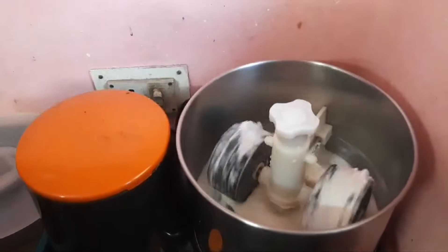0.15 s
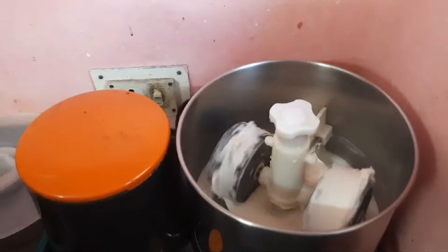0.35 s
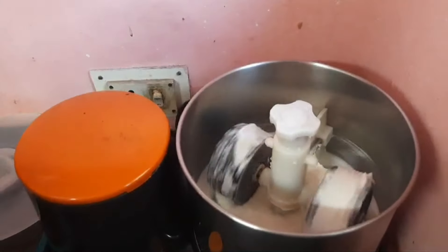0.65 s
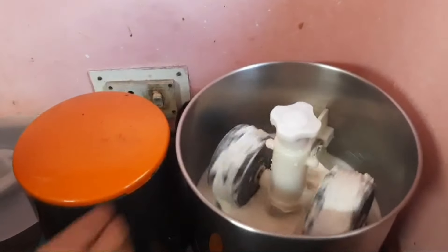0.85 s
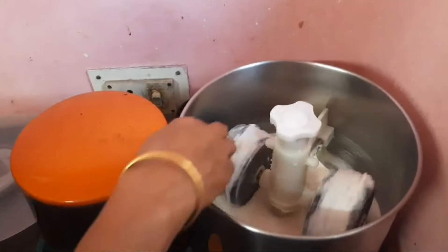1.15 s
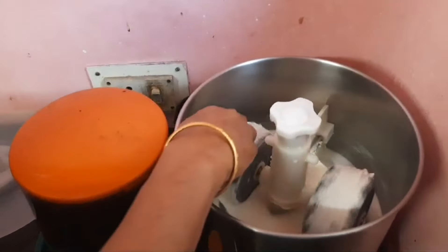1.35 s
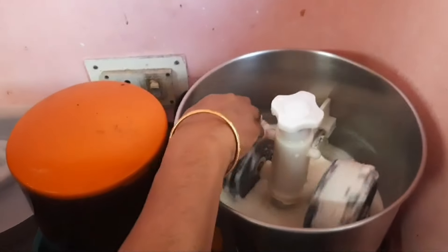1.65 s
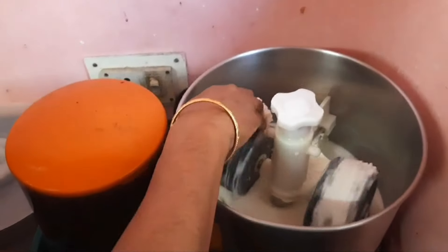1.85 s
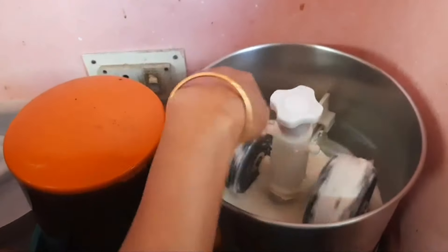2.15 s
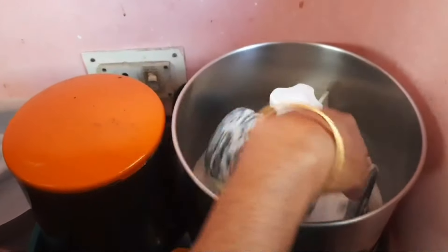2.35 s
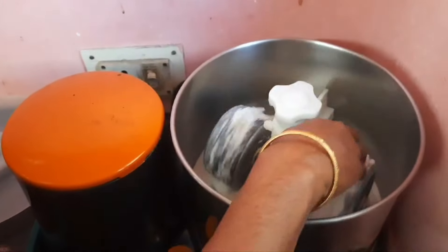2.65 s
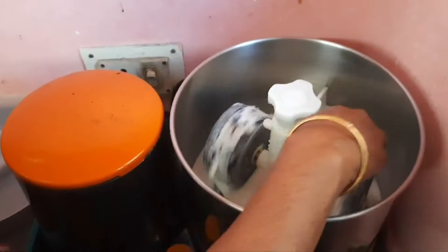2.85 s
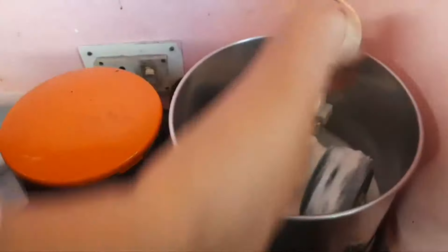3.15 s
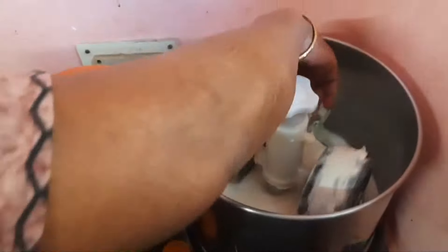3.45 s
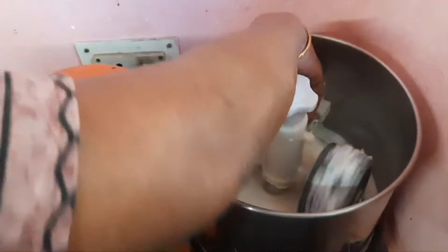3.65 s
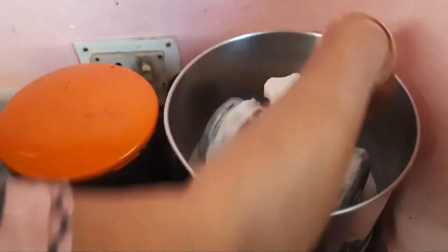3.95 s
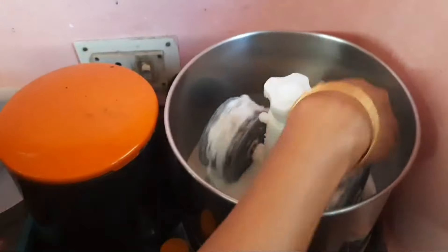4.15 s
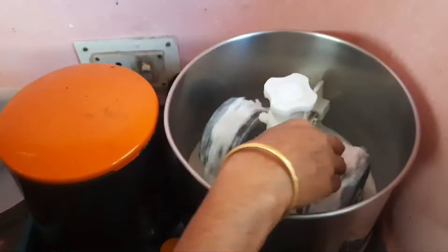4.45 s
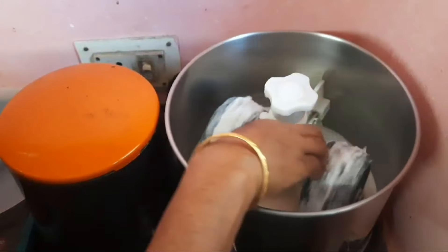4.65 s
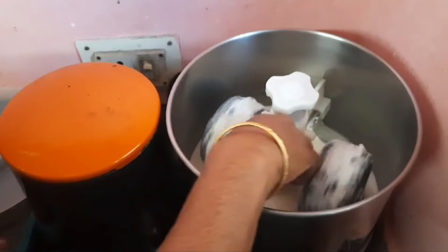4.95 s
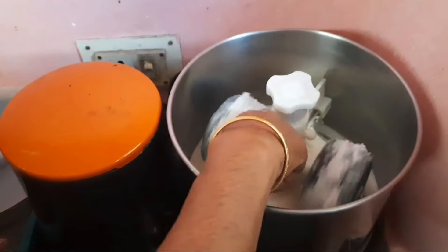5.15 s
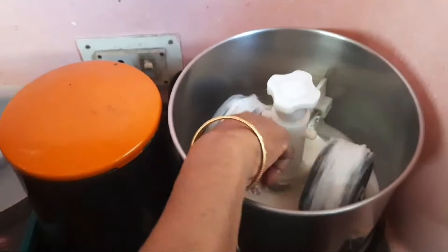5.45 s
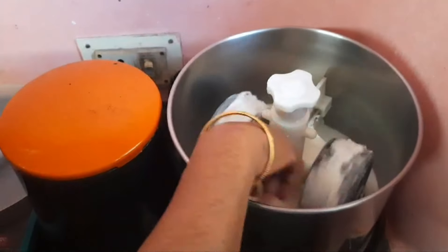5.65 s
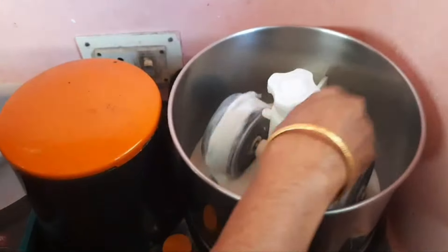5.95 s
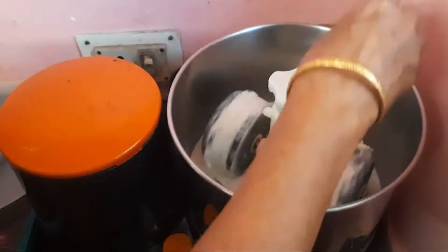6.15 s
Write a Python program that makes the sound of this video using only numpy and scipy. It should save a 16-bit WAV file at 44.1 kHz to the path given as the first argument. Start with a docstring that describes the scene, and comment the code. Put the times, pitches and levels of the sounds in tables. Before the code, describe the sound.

Close, steady motor hum and gritty stone grinding in a metal drum, irregular grain crunches, and a single hard knock near the start.

```python
"""A small kitchen, a tabletop wet grinder close to a microphone with two ports.
From the start its motor hums in steady tones, and two stone rollers shake the casing and ring the steel drum;
stone rubs through wet grain, batter snaps, and grains crunch in short bursts, soft ones about once a roller turn.
At 0.8 s something is set down on the counter with a knock and bounces; the walls return knock and grinding.
From about 4 s a low drone swells from outside. All levels are those before the microphone rounds the peaks."""
import sys
import numpy as np
from scipy import signal
from scipy.fft import rfft, irfft, next_fast_len
from scipy.io import wavfile

SR = 44100
rng = np.random.default_rng(int(sys.argv[2]) if len(sys.argv) > 2 else 0)


def dump(signal):
    """Clip the signal to [-1, 1] and save it as 16-bit WAV at the path in sys.argv[1]."""
    limited = np.clip(np.atleast_2d(signal).T, -1, 1)
    pcm = np.round(limited * 32767).astype(np.int16)
    wavfile.write(sys.argv[1], SR, pcm)


N = 277830
T = np.arange(N) / SR


def from_db(db):
    """Decibels to gain."""
    return np.exp(np.asarray(db) * np.log(10) / 20)


def rms_one(x):
    """Scale to rms 1."""
    return x / np.sqrt(np.mean(x ** 2) + 1e-20)


def in_time(rows):
    """Columns of a curve over time, one value a sample."""
    s, *columns = np.transpose(rows)
    return [np.interp(T, s, column) for column in columns]


def at_hz(points, hz):
    """Read a spectrum on a log-frequency axis."""
    where, level_db = np.transpose(points)
    return np.interp(np.log(hz), np.log(where), level_db)


def drift(rate_hz):
    """Slow chance of spread 1: noise twice through a one-pole low-pass, made at every 40th sample."""
    r = np.exp(-2 * np.pi * rate_hz * 40 / SR)
    noise = rng.standard_normal(N // 40 + 2002)
    slow = signal.lfilter([1], [1, -2 * r, r * r], noise)[2000:]
    return np.interp(np.arange(N) / 40, np.arange(len(slow)), rms_one(slow))


def bandpass(order, low_hz, high_hz, x):
    """Keep one band of x."""
    return signal.sosfilt(signal.butter(order, [low_hz, high_hz], "band", fs=SR, output="sos"), x)


def highpass(cutoff_hz, x):
    """Take the bass out of x."""
    return signal.sosfilt(signal.butter(2, cutoff_hz, "high", fs=SR, output="sos"), x)


def ringing(hz, r):
    """Feedback coefficients of a resonance that shrinks by r each sample."""
    return [1, -2 * r * np.cos(2 * np.pi * hz / SR), r * r]


# what the two microphone ports share: (f/Hz, likeness 0-1, left minus right level/dB, left late by samples)
PORTS = [(40, .95, 0, 4), (130, .99, 0, 4), (290, .995, 0, 4), (410, .8, -2, 6), (520, .65, 2.5, 7),
         (660, .55, 4.5, 8), (860, .45, 0.2, 8), (1300, .45, -0.2, 9), (1720, .4, 1.0, 11),
         (2000, .35, 1.5, 0.5), (2500, .3, 1.5, 1.5), (4500, .15, 1.5, 5), (5700, .1, .5, 5),
         (7300, .05, -3.5, 4), (9300, .05, 2.5, 4), (15000, .05, .3, 4)]


def spread(pair, hz):
    """Two unrelated signals reach the ports with the likeness, lean and lag of this pitch, at joint rms 1."""
    where, *columns = np.transpose(PORTS)
    alike, lean_db, lag = [np.interp(np.log(hz), np.log(where), column) for column in columns]
    alike = np.clip(alike, 0, 1)
    shared = np.sqrt(1 + alike) * pair[0]
    opposed = np.sqrt(1 - alike) * pair[1] * [[1], [-1]]
    left, right = rms_one(shared + opposed)
    return np.array([np.roll(left, round(lag)) * from_db(lean_db / 2), right * from_db(-lean_db / 2)])


def gritty(per_s, size_db, share):
    """Two pairs of noises (neighbouring bands take turns) that carry grit clicks at shared moments."""
    sizes = from_db(size_db * np.minimum(rng.exponential(1, N), 3))
    clicks = (rng.random(N) < per_s / SR) * sizes
    return rng.standard_normal((2, 2, N)) * np.sqrt(1 + (share * rms_one(clicks)) ** 2)


def shaken(modes, force, flicker_db):
    """The force through each resonance twice, which keeps the valleys dark; each one may flicker by itself."""
    out = 0
    for k, (hz, width_hz, level_db) in enumerate(modes):
        section = [1, 0, -1, *ringing(hz, np.exp(-np.pi * width_hz / SR))]
        gain = from_db(level_db + (flicker_db * drift(17.5) if flicker_db else 0))
        out = out + gain * spread(signal.sosfilt([section, section], force[k % 2]), hz)
    return out


# motor tones, most near multiples of twice the mains rate: (f/Hz, rms level/dB, left minus right level/dB, waver/dB)
HUM = [(99.9, -47, 0, 3.0), (199.9, -52, 0, 3.0), (300.1, -18.5, 0, 1.5), (744.6, -41, 8, 2.0),
       (800.1, -36, -2, 1.5)]


def motor():
    """Magnetic pull in the induction motor gives tones of fixed pitch, each wavering a little in level."""
    out = 0
    for hz, level_db, pan_db, waver_db in HUM:
        ports_db = level_db + waver_db * drift(2.54) + np.array([[pan_db / 2], [-pan_db / 2]])
        tone = np.sqrt(2) * np.sin(2 * np.pi * (hz * T + rng.random()))
        out = out + from_db(ports_db) * tone
    return out


# casing and counter resonances: (f/Hz, width f/Hz, rms level/dB before the load is added)
CASING = [(56, 11, -55), (95.4, 6.9, -44), (112.6, 11, -37.5), (133.5, 26, -42), (215.2, 34.5, -31.5),
          (240.7, 30.4, -29.5), (265, 25.4, -28), (281.14, 14.2, -17.5), (325.7, 39, -38), (390.5, 76, -36),
          (453.5, 54, -33), (547.5, 48, -36), (597, 76, -42.5), (737, 79, -37.5), (803, 25, -41.5),
          (862, 50, -45), (940, 70, -54)]


def casing(shake_db):
    """The rollers shake casing and counter: plain noise through their resonances, louder under load."""
    return from_db(shake_db) * shaken(CASING, rng.standard_normal((2, 2, N)), flicker_db=0)


# turns per s, a moment of most pressure/s, depth/dB
ROLLER_HZ, ROLLER_TOP_S, ROLLER_DB = 5.9, 3.03, .8


def roller_pressure(grind_db):
    """Pressure in dB: the grinding load, a swing with each roller turn and a small random flicker."""
    turn = np.cos(2 * np.pi * ROLLER_HZ * (T - ROLLER_TOP_S))
    return grind_db + ROLLER_DB * turn + .8 * drift(24.0)


# steel drum resonances: (f/Hz, width f/Hz, rms level/dB before pressure and flicker; relative in a crunch)
DRUM = [(1095.5, 32, -45.5), (1159, 91, -52), (1520, 52, -55.5), (1900, 98, -50), (2175, 420, -50),
        (2432, 364, -46.5), (3150, 520, -48.5), (3903, 400, -57), (4457, 150, -55.5), (5710, 1240, -52),
        (6300, 2000, -53), (8560, 890, -61), (11650, 2200, -61)]


def drum(force, pressure_db):
    """Gritty rubbing rings the steel drum, louder with pressure, each resonance flickering by itself."""
    return from_db(pressure_db) * shaken(DRUM, force, flicker_db=1.93)


# stone on stone through wet grain, a relative spectrum: (f/Hz, level/dB per Hz)
GRIND = [(30, -16), (70, -3), (160, -5.5), (350, 0), (700, -3.5), (950, -3), (1400, -9), (2700, -40.5),
         (3700, -24.5), (7000, -16), (10000, -28), (12000, -23.5), (14000, -25), (16500, -25.5)]
GRIND_DB = -32   # rms of the whole


def grinding(force, pressure_db, patchy_db):
    """Half-octave bands of the rubbing force; the treble follows the roller pressure and flickers a little."""
    out, edges = 0, 36 * 2 ** (np.arange(19) / 2)
    for k, (low, high) in enumerate(zip(edges, edges[1:])):
        hz = np.sqrt(low * high)
        band = bandpass(2, low, high, force[k % 2])
        treble = hz / (hz + 1500)
        gain_db = at_hz(GRIND, hz) + treble * (pressure_db + patchy_db * drift(37.0))
        out = out + from_db(gain_db) * np.sqrt(high - low) * spread(band, hz)
    return from_db(GRIND_DB) * rms_one(out)


CRACKLE_DB = -57.5   # rms at zero pressure


def crackle(pressure_db, per_s, cycles):
    """Wet batter tears off the stones in small snaps at one of eight pitches, losing 60 dB in these cycles."""
    sizes = from_db(3.0 * np.minimum(rng.exponential(1, N), 3)) * (rng.random(N) < per_s / SR)
    uneven = 1 + .4 * rng.standard_normal((2, N))   # each port gets its own strength and sign
    snaps = sizes * uneven * rng.choice([-1, 1], (2, N)) + 1e-18
    dealt, out = rng.integers(0, 8, N), 0
    for k, hz in enumerate(np.geomspace(5500, 13000, 8)):
        r = from_db(-60 * hz / (cycles * SR))
        out = out + signal.lfilter([1, 0, -1], ringing(hz, r), snaps * (dealt == k))
    return from_db(CRACKLE_DB + 2 * pressure_db) * rms_one(out)


# hard grains crushed under a roller: (t/s, nominal ring peak level/dB, rustle and hiss level/dB above the ring)
CRUNCHES = [(0.1594, -17, -12, -17), (0.197, -21.5, -3, -9), (0.6195, -16, -9, -17), (0.8774, -26, -21, 5),
            (0.9834, -23, 1, 1), (1.2524, -29, 3, 9), (1.3554, -23, 0, -20), (1.5289, -20, -3, -23),
            (1.6864, -16.5, -23, -7), (2.0428, -20, -4, -8), (2.2074, -16.5, -8, -10),
            (2.37, -20, -1.5, -1), (3.022, -14.5, -2, -13), (3.0494, -26, -1, -29), (3.3214, -21, -5, -17),
            (3.3794, -20.5, -4, -15), (3.7174, -22, -1, -14), (3.8174, -21.5, -4, -15),
            (3.8804, -15.5, -1.5, -20), (3.9194, -24, -3, -16), (4.2283, -19, -24, -34),
            (4.3394, -17, -6, -13), (4.6034, -20, -4, -3), (4.7341, -20, -12, -13), (4.8474, -27, -3, -13),
            (5.0584, -27, -2, 4), (5.3612, -22, -12, -15), (5.4574, -26.5, 3, 1)]
# soft grain: mean ring peak level/dB, rustle and hiss level/dB above the ring; scatter of levels/dB and of time/s
SOFT_DB, SOFT_RUSTLE_DB, SOFT_HISS_DB = -37.5, -0.5, 2
SOFT_SCATTER_DB, SOFT_SCATTER_S = 3.0, .015


def soft_crunches():
    """One soft crunch near the top of each roller turn, left out where a hard grain breaks."""
    tops = ROLLER_TOP_S % (1 / ROLLER_HZ) + np.arange(int(N / SR * ROLLER_HZ)) / ROLLER_HZ
    chance = rng.standard_normal((len(tops), 4))
    times = np.abs(tops + SOFT_SCATTER_S * chance[:, 0])
    levels_db = [SOFT_DB, SOFT_RUSTLE_DB, SOFT_HISS_DB] + SOFT_SCATTER_DB * chance[:, 1:]
    to_hard_s = np.abs(tops[:, None] - np.array(CRUNCHES)[:, 0]).min(axis=1)
    return np.c_[times, levels_db][to_hard_s > .05]


CRUNCH_S, CRUNCH_RISE = 0.016, 2.5   # s to die to about a third; rate of rise over rate of dying


def crunches():
    """Each crushed grain is a quick burst that rings the drum, with a rustle and a hiss above."""
    gains, age = np.zeros((3, N + SR)), T[:SR // 4] / CRUNCH_S
    # the rms lies below the peak
    shape = from_db(-8.5) * (1 - np.exp(-CRUNCH_RISE * age)) * np.exp(-age)
    for s, peak_db, rustle_db, hiss_db in [*CRUNCHES, *soft_crunches()]:
        at = round(s * SR)
        gains[:, at:at + len(age)] += from_db(peak_db + np.array([[0], [rustle_db], [hiss_db]])) * shape
    force = gritty(per_s=1200, size_db=3.0, share=.8)
    middle = [mode for mode in DRUM if 1400 < mode[0] < 4200]
    ring = rms_one(shaken(middle, force, flicker_db=4.0))
    rustle = spread(bandpass(4, 4300, 7000, force[0]), 4400)
    hiss = spread(bandpass(2, 7500, 14000, force[1]), 10000)
    ring_gain, rustle_gain, hiss_gain = gains[:, :N]
    return ring_gain * ring + rustle_gain * rustle + hiss_gain * hiss


# landing and bounces: (t/s, blow level/dB)
KNOCKS = [(0.8121, -10.5), (.817, -19.5), (0.821, -22), (.828, -21), (.836, -32), (.853, -26), (.866, -25)]
# what the knock rings with: (f/Hz, relative level/dB, t60/s)
COUNTER = [(400, 8, .2), (450, -3, .09), (660, -2, .08), (791, -4, .12), (985, -13, .08), (1803, -17, .05),
           (2519, -15, .03), (3941, -22, .02), (6228, -12, .015)]
# noisy part of the knock: (low f/Hz, high f/Hz, relative level/dB, t60/s)
THUD = [(333, 800, 0, 0.067), (720, 1100, -52, 0.045), (1090, 3600, -10, 0.084), (3500, 6100, -19, 0.054),
        (7500, 16000, -10, 0.018)]


def knock():
    """Every bounce strikes the counter modes with strengths of its own and sets off noise that dies by band."""
    at, out = [round(s * SR) for s, db in KNOCKS], np.zeros(N)
    blows = np.full(N, 1e-18)
    blows[at] = from_db(np.array(KNOCKS)[:, 1])
    for hz, level_db, t60 in COUNTER:
        clicks = blows.copy()
        clicks[at] *= from_db(level_db - 2.5 + rng.normal(0, 1.5, len(at)))
        r = from_db(-60 / (t60 * SR))
        out += signal.lfilter([0, np.sin(2 * np.pi * hz / SR)], ringing(hz, r), clicks)
    for low_hz, high_hz, level_db, t60 in THUD:
        dying = signal.lfilter([1], [1, -from_db(-60 / (t60 * SR))], blows)
        noise = bandpass(2, low_hz, high_hz, dying * rng.standard_normal(N))
        out += from_db(level_db) * noise * np.sqrt(SR / 2 / (high_hz - low_hz))
    return highpass(220, out)   # a small object sends out no bass


KNOCK_LEFT_DB, KNOCK_LEFT_LATE = 4.5, 5.2   # left minus right level/dB; left late by samples (rounded)


def at_ports(blow):
    """The direct knock, louder and a little later at the left port."""
    late = np.roll(blow, round(KNOCK_LEFT_LATE))
    return np.array([late, blow]) * from_db([[KNOCK_LEFT_DB / 2], [-KNOCK_LEFT_DB / 2]])


KITCHEN_T60_S, KITCHEN_DB, GRIND_ROOM_DB = 0.38, -20, -19   # decay; what knock and grinding send to the room


def kitchen(x):
    """Echoes between hard walls: six feedback delays a side, worked out as one spectrum."""
    size = next_fast_len(N + SR // 2)
    w = np.arange(size // 2 + 1) * 2 * np.pi / size
    spectrum, out = rfft(x, size), np.zeros((2, N))
    for side in range(2):
        walls = 0
        for k, lag in enumerate(rng.uniform(.006, .03, size=6) * SR):
            loss = from_db(-60 * lag / SR / KITCHEN_T60_S)
            walls = walls + (-1) ** k / (np.exp(1j * w * lag) / loss - 1)
        out[side] = irfft(spectrum * walls, size)[:N]
    return out


# the tone from outside: (t/s, f/Hz, rms level/dB)
DRONE = [(4.0, 51, -73), (4.35, 51.5, -46), (4.95, 54, -49), (5.15, 55, -46), (5.9, 57.8, -41),
         (6.3, 57.7, -56)]


def drone():
    """A low sine from far off that swells and climbs, then sinks in level."""
    hz, level_db = in_time(DRONE)
    return from_db(level_db) * np.sqrt(2) * np.sin(2 * np.pi * np.cumsum(hz) / SR)


# load on the rollers: (t/s, casing shake level/dB, grinding level/dB)
LOAD = [(0, 3, 4), (.7, -0.5, 3), (1.4, -0.5, 2.5), (2.1, 0.5, 3.5), (2.5, 0, 2.5), (3.1, 1, 3.5),
        (3.9, 0, 3), (4.8, 2, 4), (5.6, -0.2, 3), (6.3, -0.5, 2.5)]


def scene():
    """Motor, shaken casing, drum, grinding, wet crackle, crunches, knock, echoes and drone."""
    shake_db, grind_db = in_time(LOAD)
    pressure_db = roller_pressure(grind_db)
    force = gritty(per_s=500, size_db=2.5, share=0.46)   # drum and grinding share it
    grind = grinding(force, pressure_db, patchy_db=1.5)
    grain = drum(force, pressure_db) + crunches() + crackle(pressure_db, per_s=91, cycles=51)
    blow = knock()
    bright = highpass(700, (grain + grind).mean(axis=0))
    echoes = kitchen(from_db(KITCHEN_DB) * blow + from_db(GRIND_ROOM_DB) * bright)
    return motor() + casing(shake_db) + grind + grain + at_ports(blow) + echoes + drone()


CUTOFF_HZ = 16100   # from here up all is at least 60 dB down


def record(dry):
    """The microphone rounds the peaks and cuts the top."""
    rounded = 1.33 * np.tanh(dry / 1.222)
    return signal.sosfilt(signal.cheby2(20, 60, CUTOFF_HZ, fs=SR, output="sos"), rounded)


dry = scene()
out = record(dry)
dump(out)
```